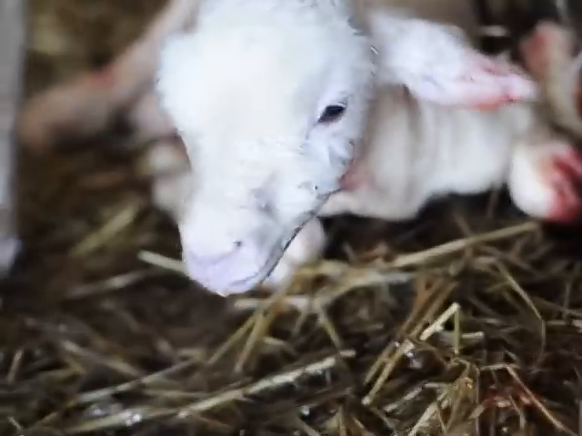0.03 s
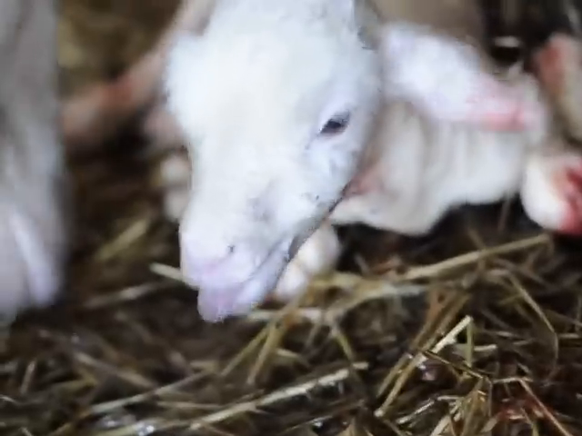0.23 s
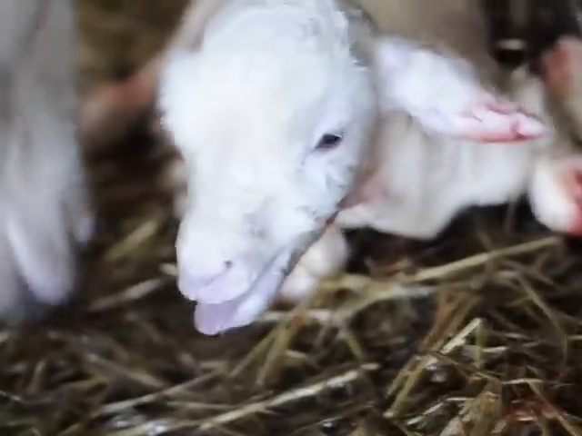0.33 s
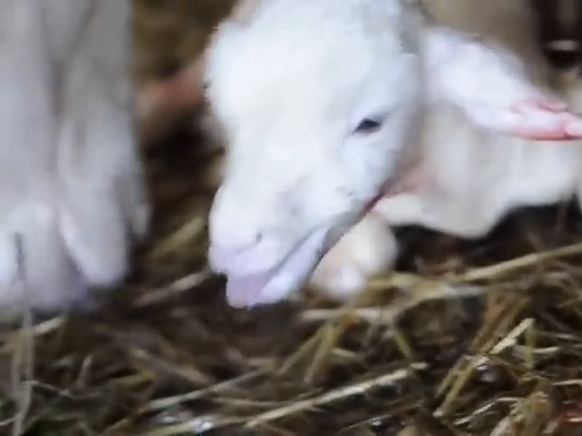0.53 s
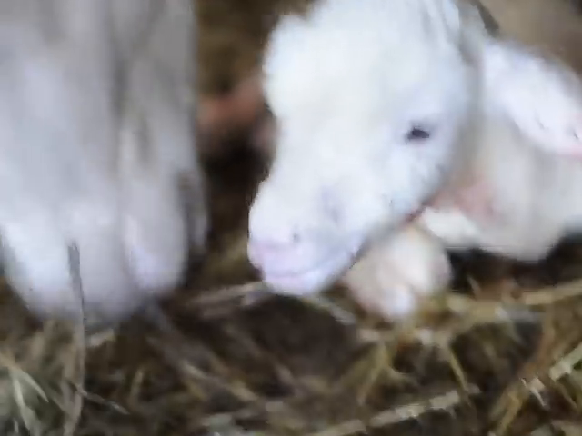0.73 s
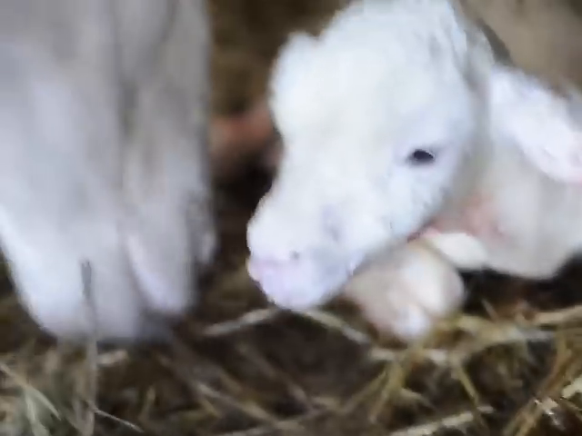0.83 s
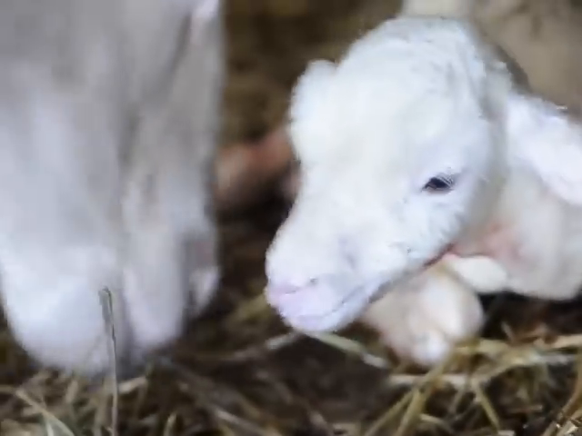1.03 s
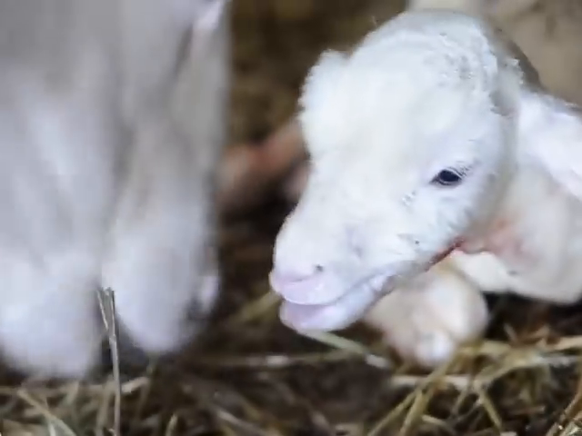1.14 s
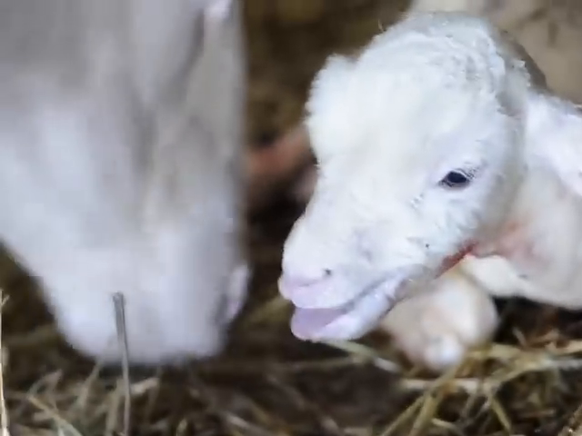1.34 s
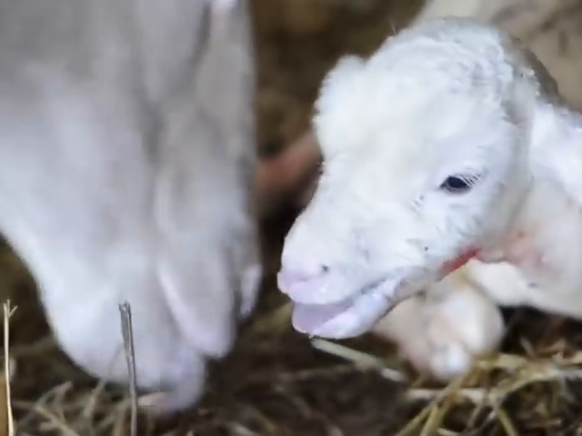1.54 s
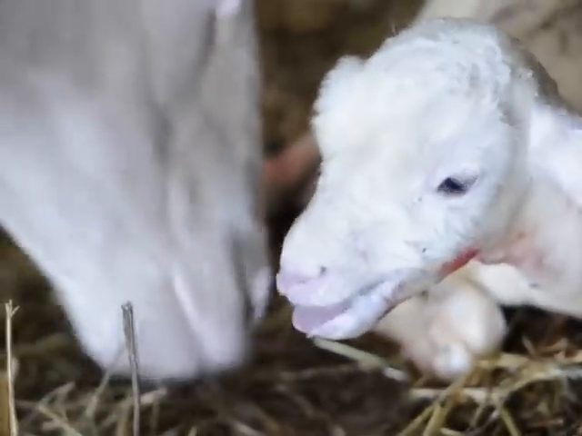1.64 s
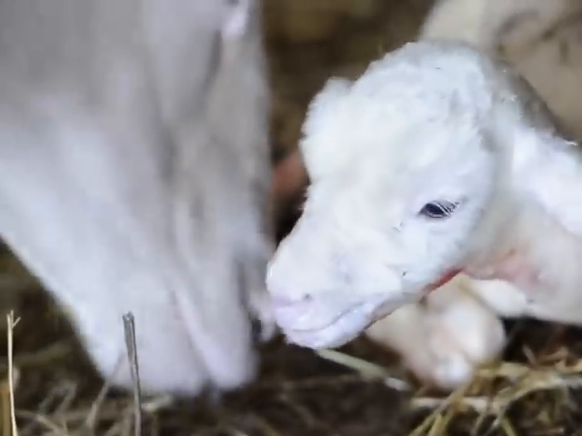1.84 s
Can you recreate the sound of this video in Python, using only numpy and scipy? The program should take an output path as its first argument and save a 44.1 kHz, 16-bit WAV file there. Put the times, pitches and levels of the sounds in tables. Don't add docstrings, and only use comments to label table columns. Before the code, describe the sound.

Close, near-mono pickup of a newborn lamb bleating twice, each call brightening as the mouth opens then fading breathily; the tail of a ewe's grunt comes first, straw crackles between calls, with low barn air and short echo.

```python
import sys
import numpy as np
from scipy import signal
from scipy.io import wavfile
from scipy.ndimage import uniform_filter1d

SR = 44100
rng = np.random.default_rng(int(sys.argv[2]) if len(sys.argv) > 2 else 0)


def unload_wav(signal):
    wavfile.write(
        sys.argv[1],
        SR,
        np.round(np.clip(np.atleast_2d(signal).T, -1, 1) * 32767).astype(np.int16),
    )


def decibels_to_gain(level_db):
    exponent = np.asarray(level_db, float) / 20
    return 10 ** exponent


N = 83790


def evened(x):
    return x / np.sqrt(np.mean(abs(x) ** 2) + 1e-20)


def add(mix, s, sound):
    part = mix[round(s * SR):][:len(sound)]
    part += sound[:len(part)]


def ring(x, hz, width):
    r = np.exp(-np.pi * width / SR)
    return 2 * signal.lfilter([1 - r], [1, -r * np.exp(2j * np.pi * hz / SR)], x + 0j).real


def slow(shape, size):
    return evened(uniform_filter1d(uniform_filter1d(rng.standard_normal(shape), size), size))


def air():
    # frequency in Hz, level in dB per Hz.
    spectrum = [(25, -12.5), (120, -2), (300, -10), (600, -7), (2000, -14.5), (6000, -24.5), (10500, -27),
                (12500, -48)]
    # time in seconds, lift of the air in dB.
    shuffle = [
        (0, 7.5),
        (.05, 5),
        (.74, -5),
        (.8, 5),
        (.83, -8),
        (.87, 6),
        (.92, 2.5),
        (1.76, 2),
        (1.82, 2.5),
        (1.9, 0.5),
    ]
    f, t, z = signal.stft(rng.standard_normal(N), SR, nperseg=512)
    hz, db = np.transpose(spectrum)
    patches = evened(uniform_filter1d(slow(z.shape, size=5), size=10, axis=0))
    z = z * decibels_to_gain(np.interp(np.log(f + 1), np.log(hz), db)[:, None] + 2.47 * patches)
    still = signal.istft(z, SR, nperseg=512)[1]
    lift_db = np.interp(t, *np.transpose(shuffle)) * np.clip(f / 4000, .3, 1)[:, None]
    hiss = signal.istft(z * decibels_to_gain(lift_db), SR, nperseg=512)[1][:N] / np.std(still)
    swell = np.exp(-((np.arange(N) / SR - 0.85) / 0.049) ** 2)
    rumble = swell * evened(ring(rng.standard_normal(N), hz=170, width=83))
    return decibels_to_gain(-60.5) * hiss + decibels_to_gain(-58) * rumble


def barn(x):
    taps = np.zeros(SR // 3)
    at = np.arange(120, len(taps) - 22, 22)
    taps[at + rng.integers(0, 22, len(at))] = rng.choice([-1., 1.], len(at))
    f, t, z = signal.stft(taps, SR, nperseg=128)
    t60 = np.interp(f, [1000, 9000], [0.2, 0.12])[:, None]
    tail = signal.istft(z * decibels_to_gain(-60 * t / t60), SR, nperseg=128)[1]
    return signal.fftconvolve(x, tail / np.linalg.norm(tail))[:N]


def straw():
    # start in seconds, peak level in dB, centre frequency in Hz.
    ticks = [(0.7241, -44, 3200), (.7246, -42, 6300), (0.7243, -43, 1600), (0.743, -53.5, 3200),
             (.768, -53, 9000), (0.786, -56, 2500), (0.8035, -43, 6200), (0.804, -47, 1830),
             (0.8677, -45.5, 5560), (0.907, -56, 4150), (1.029, -48.5, 6900), (1.037, -48, 1890),
             (1.743, -45, 1870), (1.757, -54, 9600), (1.8038, -41, 7730), (1.8103, -39, 6700),
             (1.819, -46, 7500), (1.834, -54, 2510), (1.878, -65, 9130), (1.051, -48, 4200)]
    t60, q, wide = .012, 5, .1
    out, t = np.zeros(N), np.arange(900) / SR
    for s, db, hz in ticks:
        burst = rng.standard_normal(900) * decibels_to_gain(-60 * t / t60)
        pitched = evened(ring(ring(burst, hz, hz / q), hz, hz / 2))
        crackle = evened(ring(ring(burst, 5000, 5000), 5000, 5000))
        tick = pitched + wide * crackle
        add(out, s, decibels_to_gain(db) * tick / abs(tick).max())
    return out


def thuds():
    # start in seconds, peak level in dB, frequency in Hz.
    pushes = [(.004, -22.5, 467), (.015, -36.5, 477), (.025, -30, 490), (0.038, -45, 456),
              (.132, -27.5, 373), (0.142, -30, 358), (0.172, -26, 406), (.193, -24, 390), (1.158, -31, 354),
              (1.165, -27.5, 564), (1.191, -27, 570), (1.343, -38, 326), (1.377, -29.5, 343),
              (1.379, -28, 1000), (1.388, -45.5, 300), (1.398, -35.5, 170), (1.512, -44, 336),
              (1.772, -41, 520.5), (1.806, -58, 785), (1.87, -43.5, 527)]
    rise_s, t60, tone_share = .003, .025, .75
    out, t = np.zeros(N), np.arange(1500) / SR
    for s, db, hz in pushes:
        noise = rng.standard_normal(1500)
        body = tone_share * np.sin(2 * np.pi * hz * t)
        body += (1 - tone_share) * evened(ring(noise, hz, hz / 2))
        scrape = decibels_to_gain(-20.5) * evened(ring(noise, hz=2500, width=1230))
        swell = 1 - np.exp(-(t / rise_s) ** 2)
        add(out, s, decibels_to_gain(db - 60 * t / t60) * swell * (body + scrape))
    return out


def throat(resonances, settle, hz, mouth, late):
    shift, skirt = 0.024, 1.33
    out = 0
    for (f, w, db, shut_db), drift_db in zip(resonances, settle):
        f = f * (1 + shift * (mouth - 1))
        gain = decibels_to_gain(db - shut_db * (1 - mouth) + drift_db * (late - .5))
        out = out + gain * (hz * w * skirt / (f * f - hz * hz + 1j * hz * w * skirt)) ** 2
    return abs(out) + 1e-4


def causal(gain):
    log = np.log(np.vstack([gain[:1], gain]))
    mirrored = np.vstack([log, log[-2:0:-1]])
    return np.exp(np.conj(signal.hilbert(mirrored, axis=0)))[1:len(log)]


def dips(k, s):
    # time in seconds, partial number, length in seconds, change in dB.
    moments = [(.155, 4, .03, 10), (.155, 8, .035, -10), (1.087, 19, .018, 10), (1.28, 18, .08, 4),
               (.225, 10, .035, -6), (.25, 8, .045, -12), (.225, 12, .035, -7), (.25, 5, .04, -5),
               (.385, 3, .022, 7), (1.07, 3, .025, -6), (.36, 4, .07, 4), (.39, 19, .15, -12),
               (.38, 16, .11, -12), (.38, 22, .05, -12), (.435, 28, .15, -12), (.45, 17, .15, -8),
               (.49, 11, .09, -4), (.495, 23, .15, 8), (.5, 7, .12, -5), (.45, 6, .07, -4),
               (.51, 12, .15, 5), (.53, 16, .13, -12), (.625, 10, .028, -20), (.63, 8, .1, 5),
               (1.065, 7, .02, -10), (.675, 15, .1, -10), (1.1, 12, .05, 7), (1.137, 3, .02, -18),
               (1.13, 18, .02, -14), (1.145, 8, .035, -8), (1.145, 15, .06, -13), (1.175, 5, .06, -10),
               (1.175, 17, .035, -14), (1.2, 22, .13, -12), (1.235, 28, .06, -18), (1.31, 15, .15, -12),
               (1.335, 10, .035, -11), (1.355, 23, .15, -11), (1.37, 13, .06, 5), (1.37, 19, .065, -19),
               (1.4, 3, .07, -9), (1.42, 5, .015, -16), (1.43, 16, .15, -10), (1.46, 30, .06, 12),
               (1.505, 14, .1, 5), (1.53, 11, .065, -13), (1.58, 13, .1, -6), (1.61, 6, .1, 5),
               (1.635, 12, .05, 6), (1.62, 19, .06, 7)]
    change_db = 0
    for dip_s, partial, length, db in moments:
        change_db = change_db + db * (k == round(partial)) * np.exp(-((s - dip_s) / length) ** 2)
    return change_db


def partials(heights, k, at, begin_s, turns, start, hoarse):
    t = np.arange(len(turns)) / SR
    _, _, _, slope_db, flutter_db = hoarse
    wander_db = 1.1 * (.5 + .07 * k) * slow(heights.shape, size=int(SR / 128 / 18))
    loss_db = np.where(k > 14, 8, slope_db * k)
    wander_db += start[at] * (flutter_db * slow(heights.shape, size=3) - 2 - loss_db)
    wander_db += dips(k, begin_s + t[at])
    phase = -.025 * k ** 2 + .035 * k * slow(heights.shape, size=60)
    lines = causal(heights * decibels_to_gain(wander_db)) * np.exp(1j * phase)
    voice = 0
    for m, line in zip(k[1:, 0], lines[1:]):
        voice = voice + (np.interp(t, t[at], line) * np.exp(2j * np.pi * m * turns)).real
    return voice


def breath(gain_at, hz, turns, rough_db, late):
    n = len(turns)
    puffs = rng.standard_normal(n) * (1 + .8 * np.cos(2 * np.pi * turns))
    f, frame_s, z = signal.stft(puffs, SR, nperseg=256)
    f = f[:, None]
    shape = gain_at(f, frame_s) + decibels_to_gain(-27.5) * np.exp(-np.log(f / 6800 + .01) ** 2 / .05)
    tilt_db = -28.5 + 7.5 * np.log2(f / 4000 + 0.2)
    hiss = signal.istft(z * shape * decibels_to_gain(tilt_db), SR, nperseg=256)[1][:n]
    hiss = hiss * np.sqrt(SR / 2 / hz) * decibels_to_gain(rough_db + 1.8 * slow(n, size=700))
    whistle_hz = 1537
    whistle = evened(ring(ring(rng.standard_normal(n), whistle_hz, 176), whistle_hz, 258))
    return hiss + decibels_to_gain(-44 + 8.8 * np.sin(np.pi * late ** 2)) * whistle


def bleat(rows, resonances, settle, hoarse):
    shut_db, open_db = -33, -15.5
    onset_s, release_s = 0.003, 0.0048
    sigh_t60, sigh_db = 0.078, 2
    s, pitch, level = np.transpose(rows)
    begin_s, s, n = s[0], s - s[0], 34000
    t = np.arange(n) / SR
    hz = uniform_filter1d(np.interp(t, s, pitch), size=500)
    level = uniform_filter1d(np.interp(t, s, level), size=500)
    mouth = np.clip((level - shut_db) / (open_db - shut_db), 0, 1)
    late = np.minimum(t / s[-1], 1)
    start = np.exp(-(t / hoarse[0]) ** 4)
    rough_db = hoarse[1] * start + hoarse[2] * late ** 2
    jitter = .0007 * decibels_to_gain(rough_db) * slow(n, size=100)
    turns = np.cumsum(hz * (1 + jitter)) / SR

    k, at = np.arange(1, 33)[:, None], np.arange(0, n, 128)
    lines = throat(resonances, settle, k * hz[at], mouth[at], late[at])
    norm = np.sqrt((lines ** 2).sum(0) / 2)
    voice = partials(lines / norm, k, at, begin_s, turns, start, hoarse)

    def gain_at(f, frame_s):
        opening, age = np.interp(frame_s, t, mouth), np.interp(frame_s, t, late)
        return throat(resonances, settle, f, opening, age) / np.interp(frame_s, t[at], norm)

    air_flow = breath(gain_at, hz, turns, rough_db, late)
    stop = np.clip((s[-1] - t) / release_s, 0, 1)
    fading_db = sigh_db * (1.5 - stop) - 60 * np.maximum(t - s[-1], 0) / sigh_t60
    sigh = np.maximum(stop, decibels_to_gain(fading_db))
    first = decibels_to_gain(np.minimum(-49.5, level + 6)) * np.sqrt(2) * np.cos(2 * np.pi * turns)
    sound = stop * (decibels_to_gain(level) * voice + first) + sigh * decibels_to_gain(level) * air_flow
    return begin_s, np.minimum(t / onset_s, 1) * sound


def lamb():
    # time in seconds, pitch in Hz, level in dB.
    bleats = [
        [(.1315, 350, -45), (.146, 386, -43.5), (.185, 397, -40), (.214, 412, -31), (.274, 419, -21),
         (.365, 423, -15.5), (.48, 429.3, -17.5), (.63, 423.5, -24.5), (.698, 399, -29)],
        [(1.0535, 435, -41), (1.072, 393, -36), (1.112, 419.5, -28), (1.17, 420, -19.5), (1.24, 425, -17),
         (1.32, 431.7, -15.5), (1.416, 434.5, -18), (1.6, 420, -24.5), (1.677, 400, -28)],
    ]
    # resonance in Hz, width in Hz, level in dB, dB lost with mouth shut.
    throats = [
        [(925, 280, -10.5, 1), (1305, 210, -10.5, -3.5), (1690, 150, -12, -2.5), (3020, 670, -9.5, 6),
         (3610, 860, -4.5, 18), (4680, 180, 1.5, 16), (5404, 370, -0.5, 14.5), (5950, 210, 1.5, 24.5),
         (7920, 270, -16.5, 1), (8730, 400, -19, 4), (10200, 120, -23.5, 9), (11190, 220, -20.5, 16),
         (13720, 1000, -27.5, 8.5)],
        [(910, 296, -13.5, 0), (1318, 95, -17, -12), (1652, 420, -8, 1.5), (3046, 260, -10.5, 4),
         (3680, 730, 1, 16), (4733, 160, 1.5, 16), (5230, 364, 0, 18), (6020, 99, -9, 11),
         (7700, 360, -11, 13.5), (8540, 150, -23.5, 0), (10600, 410, -22, 9), (11550, 300, -41, 12.5),
         (12100, 500, -25.5, 11.5)],
    ]
    settling = [
        [0, -1.5, 12, -4, 1.8, -1, -3, -8, 10, 4.7, -3.5, -11, 4],
        [0, -1.5, 5.2, -7, 1.1, -3, -0.5, -10, -5.5, 7, 0, -1, 1.4],
    ]
    # hoarse start in seconds, its extra breath in dB, extra breath by the end in dB,
    # loss at the start in dB per partial, flutter in dB.
    hoarseness = [
        (.064, 11, 7, .5, 2.5),
        (.024, 13, 7, -.5, 3),
    ]
    out = np.zeros(N)
    for call in zip(bleats, throats, settling, hoarseness):
        add(out, *bleat(*call))
    return out


def scene():
    near = straw() + thuds() + lamb()
    mid = near + decibels_to_gain(-18) * barn(near) + air()
    side = decibels_to_gain(-30) * np.diff(barn(mid), n=2, prepend=[0, 0])
    return np.array([mid + side, mid - side])


def band_limit(x):
    return signal.sosfilt(signal.butter(12, 14340, fs=SR, output="sos"), x)


def record(dry):
    rolloff = signal.butter(6, 12260, fs=SR, output="sos")
    heard = signal.sosfilt(rolloff, dry)
    return band_limit(heard)


dry = scene()
out = record(dry)
unload_wav(out)
```